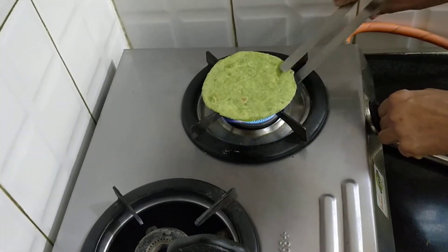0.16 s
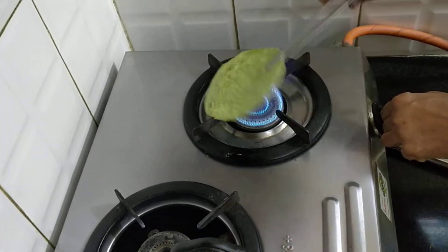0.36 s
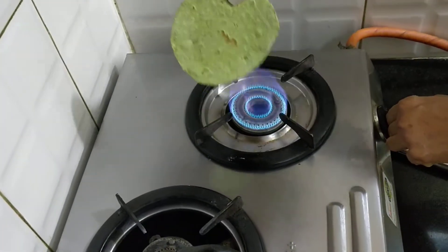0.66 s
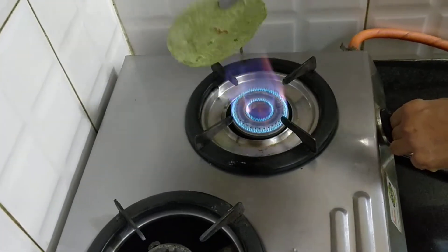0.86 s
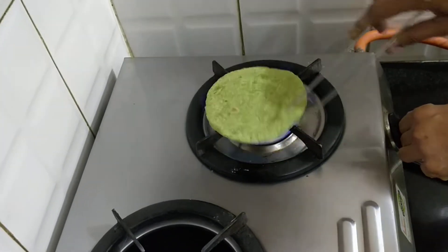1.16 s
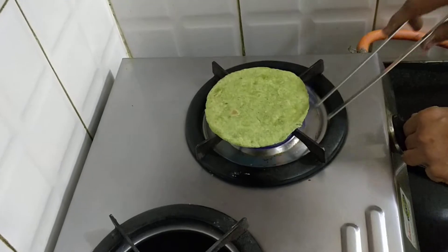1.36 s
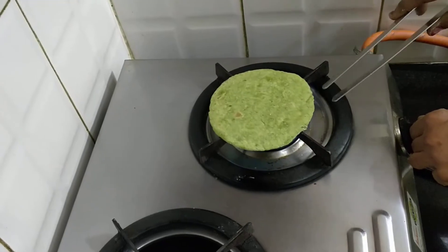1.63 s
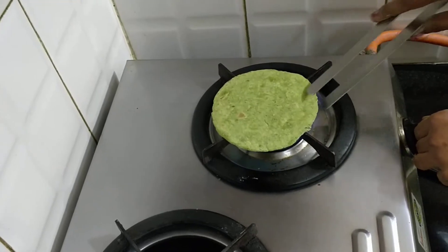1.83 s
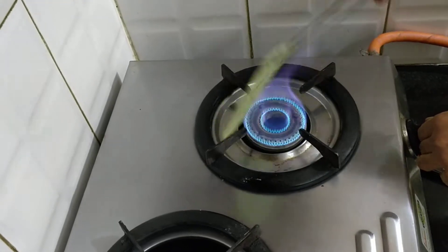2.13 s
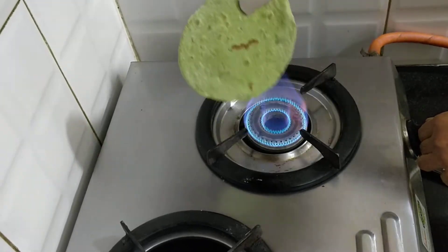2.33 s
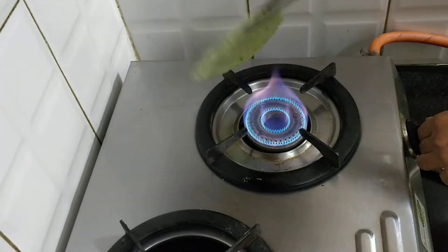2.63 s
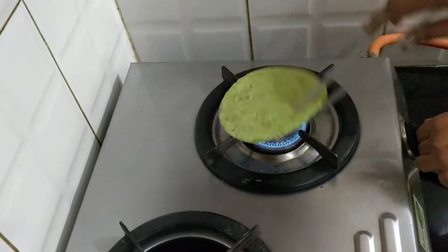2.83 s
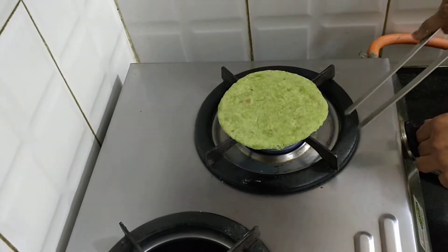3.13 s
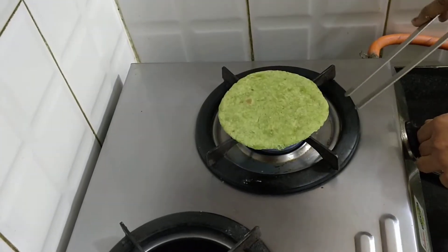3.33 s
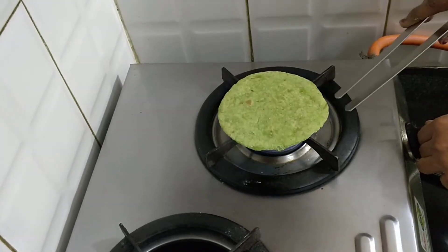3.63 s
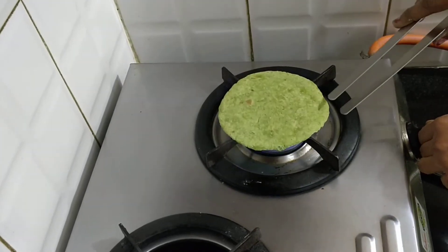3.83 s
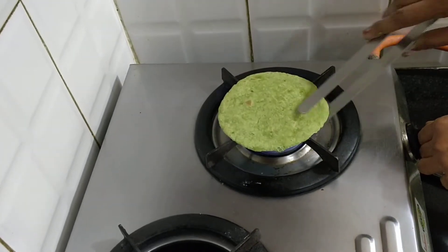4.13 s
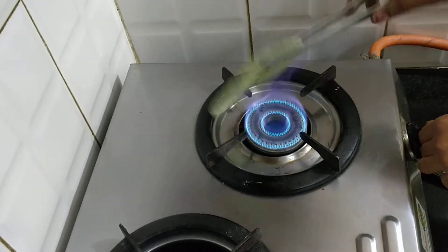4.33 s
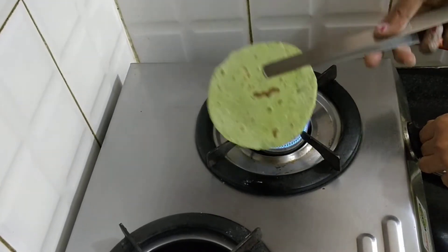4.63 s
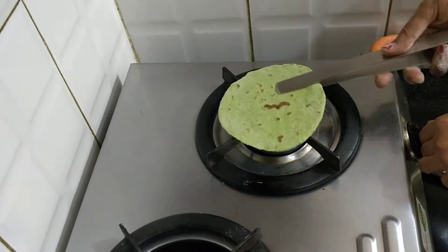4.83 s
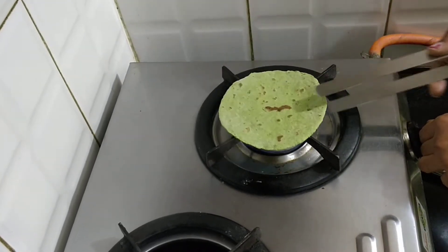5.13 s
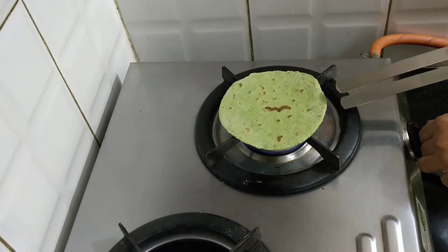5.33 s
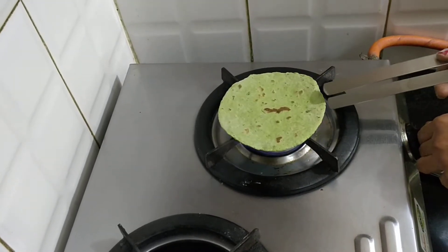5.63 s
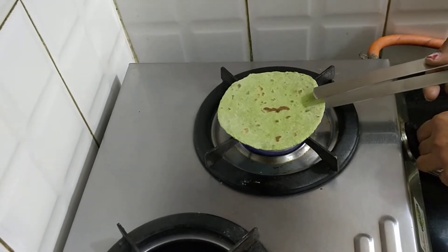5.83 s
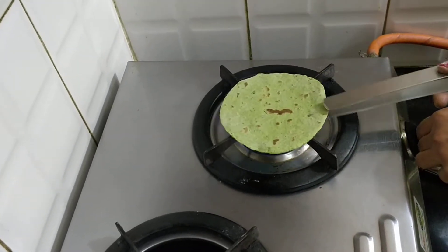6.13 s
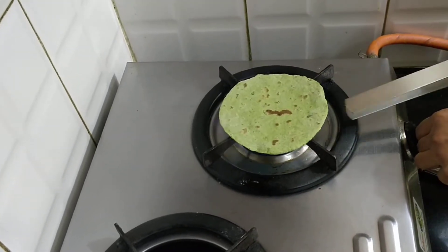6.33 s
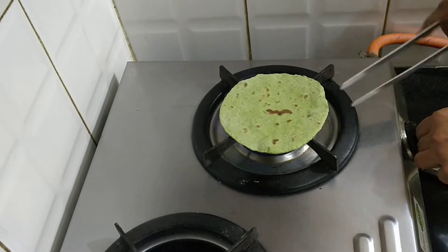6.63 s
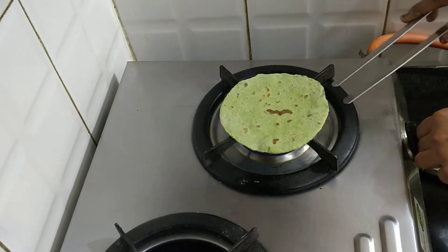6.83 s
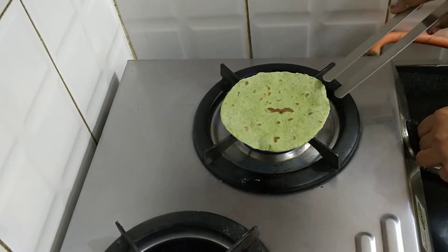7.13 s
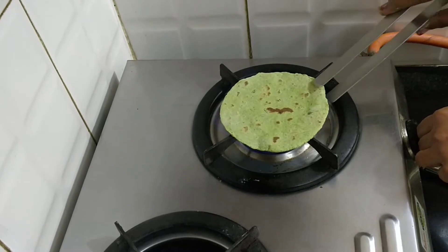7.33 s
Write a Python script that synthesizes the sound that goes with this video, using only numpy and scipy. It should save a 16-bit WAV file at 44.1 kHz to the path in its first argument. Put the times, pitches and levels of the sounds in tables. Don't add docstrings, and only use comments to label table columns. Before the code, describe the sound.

In a small tiled kitchen, metal tongs bump and scrape a burner grate in bursts, with one bright hard clack and quiet gas hiss.

```python
import sys
import numpy as np
from scipy import signal
from scipy.fft import rfft, irfft, next_fast_len
from scipy.io import wavfile
from scipy.ndimage import uniform_filter1d

SR = 44100
rng = np.random.default_rng(int(sys.argv[2]) if len(sys.argv) > 2 else 0)


def undo_db(level):
    steps = np.asarray(level, float) / 20
    return 10 ** steps


def generate_wav(sig):
    pcm = np.round(np.clip(np.atleast_2d(sig).T, -1, 1) * 32767).astype(np.int16)
    wavfile.write(sys.argv[1], SR, pcm)


N = 329868

# f/Hz, correlation/1
LIKENESS = [(60, 0.99), (130, 0.98), (290, 0.71), (640, 0.39), (1410, -0.25), (3100, 0.064), (6820, -0.01),
            (15000, 0.088)]
# f/Hz, left minus right level/dB
PORT_BALANCE = [(60, -0.5), (110, 3), (200, 2), (380, -2.5), (700, 2.5), (1290, -2), (2380, 1), (4400, 1),
                (8120, -4), (15000, 18)]
# f/Hz, t60/s
KITCHEN_DECAY = [(300, 0.51), (1000, 0.47), (3000, 0.33), (8000, 0.4), (14000, 0.27)]


def evened(x):
    return x / np.sqrt(np.mean(x ** 2) + 1e-20)


def read(points, hz):
    f, value = np.transpose(points)
    return np.interp(np.log(hz + 1), np.log(f + 1), value)


def add(mix, s, sound):
    fade = np.minimum(np.arange(sound.shape[1])[::-1] / 800, 1) ** 2
    part = mix[:, round(s * SR):][:, :sound.shape[1]]
    part += (sound * fade)[:, :part.shape[1]]


def sides(balance, hz):
    return undo_db(np.multiply.outer([.5, -.5], read(balance, hz)))


def coloured(x, colour, balance):
    hz = np.fft.rfftfreq(x.shape[1], 1 / SR)
    return irfft(rfft(x) * undo_db(read(colour, hz)) * sides(balance, hz), x.shape[1])


def partly_alike(first, second, hz_likeness):
    return np.array([first, hz_likeness * first + np.sqrt(1 - hz_likeness ** 2) * second])


def noise(colour, balance, size, decays=None, patchy_db=0.):
    frames, hz = size // 256 + 6, np.fft.rfftfreq(1024, 1 / SR)
    a, b, c, d, patches = rng.standard_normal((frames, 513, 5)).T
    patches = uniform_filter1d(patches, size=10, axis=0)
    patches = evened(uniform_filter1d(patches, size=12, axis=1))
    same = np.clip(read(LIKENESS, hz), -1, 1)[:, None]
    spectra = partly_alike(a + 1j * b, c + 1j * d, same)
    level_db = read(colour, hz)[:, None] + patchy_db * patches
    if decays:
        t = np.arange(frames) * 256 / SR
        level_db = level_db - 60 * t / read(decays, hz)[:, None]
    spectra = spectra * undo_db(level_db) * sides(balance, hz)[:, :, None]
    out = signal.istft(spectra, nperseg=1024, noverlap=768)[1][:, :size]
    onset = out.mean(0)[:2000 if decays else size]
    return out / np.sqrt(np.mean(onset ** 2))


def ring(modes, lag_ms, size):
    t = np.maximum(np.arange(size) / SR - np.array([[0], [lag_ms / 1000]]), 0)
    return sum(undo_db(db - 60 * t / t60) * np.sin(2 * np.pi * hz * t) for hz, db, t60 in modes)


def air():
    # f/Hz, spectral level/dB per Hz
    rumble_colour = [(11, -32), (18, 3.5), (38, -11), (69, -0.5), (108, -3), (157, -14), (203, -15.5),
                     (227, -37), (249, -13), (294, -12.5), (329, -23.5), (396, -20.5), (418, -21),
                     (742, -27), (1500, -37.5), (1950, -73), (3300, -120)]
    # f/Hz, spectral level/dB per Hz
    hiss_colour = [(880, -28), (1500, -1), (1670, -1), (1810, -5.5), (2420, -4.5), (3290, -7), (4950, -4.5),
                   (5420, -7), (6950, -5), (9090, -11.5), (9850, -11.5), (11300, 0), (13500, -3.5),
                   (15100, 1), (16200, -16)]
    # f/Hz, width/Hz, lift/dB
    humps = [(38.8, 10, -4), (65, 10, 4), (73.3, 8.5, -4.5), (88, 12, -2), (204, 14, 6.5), (317, 33, 4.5),
             (390, 6.6, 10.5), (489.5, 13, 6.5)]
    frames = next_fast_len(N)
    hz = np.fft.rfftfreq(frames, 1 / SR)
    lift_db = sum(db / (1 + ((hz - f) / width * 2) ** 2) for f, width, db in humps)
    white = rfft(rng.standard_normal((2, frames)))
    pair = partly_alike(white[0], white[1], np.clip(read(LIKENESS, hz), -1, 1))
    gain = undo_db(read(rumble_colour, hz) + lift_db) * sides(PORT_BALANCE, hz)
    rumble = irfft(pair * gain, frames)[:, :N]
    hiss = noise(hiss_colour, PORT_BALANCE, N, patchy_db=-1.0)
    return undo_db(-49.5) * evened(rumble) + undo_db(-63) * hiss


def rubbed(grit, modes):
    out = 0
    for hz, width, db in modes:
        peak = signal.iirpeak(hz, hz / width, SR)
        once = signal.lfilter(*peak, grit)
        out = out + undo_db(db) * evened(signal.lfilter(*peak, once))
    return evened(out)


def stroke(row, *layers):
    s, length, *levels_db = row
    at = np.arange(round(s * SR), min(round((s + length) * SR), N))
    press_db = np.interp((at / SR - s) / length, [0, 0.25, 1], [-14.5, 0, -11])
    mix = sum(undo_db(db) * layer[:, at] for db, layer in zip(levels_db, layers))
    return s, mix * undo_db(press_db) * signal.windows.tukey(len(at), .15)


def slides():
    # t/s, length/s, stove-top level/dB, prong level/dB, fine hiss level/dB
    strokes = [(0.042, 0.25, -61, -59.5, -61), (0.152, 0.14, -60.5, -82, -72),
               (0.945, 0.12, -49.5, -63, -69), (1.043, 0.17, -56, -84, -75), (1.769, 0.14, -54.5, -83, -58),
               (1.83, 0.15, -66, -61.5, -61), (2.02, 0.15, -64, -80, -70), (2.569, 0.14, -55.5, -57.5, -59),
               (2.68, 0.11, -52, -60, -75), (3.943, 0.092, -56, -61, -58), (3.996, 0.13, -49.5, -61, -59),
               (4.452, 0.17, -49.5, -62.5, -64), (5.733, 0.085, -62, -59, -61),
               (5.779, 0.11, -59, -57, -64), (5.867, 0.14, -53.5, -70, -67),
               (7.356, 0.058, -53.5, -55, -56.5), (7.427, .06, -61, -73, -61)]
    # f/Hz, width/Hz, level/dB
    dragged_top = [(492.8, 22, -7.5), (606, 46, -17), (269, 42, -8)]
    # f/Hz, width/Hz, level/dB
    prongs = [(743, 170, -7), (809, 84, 2.5), (1049, 16, -7.5), (1490, 220, -16)]
    # f/Hz, spectral level/dB per Hz
    hiss_colour = [(2000, -15), (3500, -12.5), (8000, -18), (9300, -28), (11300, -14), (15500, -10.5),
                   (16200, -11.5)]
    # t/s, length/s, level/dB
    squeak = (0.1, .14, -65)
    # f/Hz, width/Hz, level/dB
    squeak_mode = [(5395, 7.8, 0)]
    out = np.zeros((2, N))
    grit = rng.standard_normal((2, N))
    roughness_db = 4.1 * evened(uniform_filter1d(rng.standard_normal(N), size=400))
    grit = grit * undo_db(roughness_db)
    grit = grit + .5 * grit[::-1]
    hiss = noise(hiss_colour, PORT_BALANCE, N, patchy_db=1.0)
    layers = rubbed(grit, dragged_top), rubbed(grit, prongs), hiss
    for row in strokes:
        add(out, *stroke(row, *layers))
    add(out, *stroke(squeak, rubbed(rng.standard_normal((2, N)), squeak_mode)))
    return out


def knocks():
    # t/s, peak level/dB, rattle re
    # body/dB, dullness/dB per octave, twin mode level/dB
    blows = [(0.169, -41.5, -15.5, 25, -5), (0.703, -20.5, -18, 3.5, -1), (0.731, -25.5, -18, 3, -14),
             (0.782, -35, -37, 5, 10), (0.927, -37, -19, 7.5, -7), (1.914, -48, -14.5, 16, -18),
             (2.429, -23.5, -21.5, 5, -31), (2.456, -29, -18.5, 9, -11), (2.602, -56.5, -6, 15, -1),
             (2.65, -41.5, -25, 16, 6), (2.686, -37.5, -17.5, 13, 3), (3.904, -28, -23, 11, -17),
             (3.93, -36, -24, 10.5, -4), (4.059, -48.5, -26, 3, 5), (4.414, -31.5, -21.5, 18, -3.0),
             (4.512, -38.5, -39, 7.0, 2), (5.651, -29.5, -22, 13, -5.5), (5.878, -38.5, -28, 21, -8),
             (7.266, -26.5, -21, 10.5, -10), (7.291, -33, -21, 10.5, 6)]
    # f/Hz, level/dB, t60/s
    stove_modes = [(256, -27, 0.92), (305.8, 8, 0.26), (308, 10, 0.056), (363, -19, 0.48),
                   (408, -14.5, 0.48), (452, -21, 0.19), (527, -5, 0.79), (564.5, -1, 0.49),
                   (603, -16, 0.57), (655, -13, 0.52), (687, -11, 0.54), (790, -19, 0.67),
                   (753, -16, 0.089), (866, -5.5, 0.31), (942, -3.5, 0.48), (1069, 7, 0.076),
                   (1178, -6, 0.068), (1525, -2.5, 0.63), (1980, -15, .2)]
    # f/Hz, level/dB, t60/s
    twin_mode = [(288, 11, 0.31)]
    # f/Hz, spectral level/dB per Hz
    rattle_colour = [(200, -3), (300, 1), (550, 4), (800, -1.5), (1100, -6), (1400, -10), (1800, -8),
                     (2500, -11), (4000, -10.5), (6300, -18.5), (9000, -17)]
    # f/Hz, left minus right level/dB
    rattle_balance = [(60, 3), (110, -0.5), (200, 1.5), (380, 2.5), (700, 1), (1290, -3.5), (2380, 4),
                      (4400, -2), (8120, -7), (15000, 15)]
    size, contact_s = 22000, 0.98e-3
    t, out = np.arange(size) / SR, np.zeros((2, N))
    no_bass = signal.butter(3, 200, "high", fs=SR, output="sos")
    rise = undo_db([[1.7], [-1.7]]) * (1 - np.exp(-t / 0.0019))
    plate = signal.sosfilt(no_bass, -ring(stove_modes, lag_ms=0.23, size=size) * rise)
    twin = signal.sosfilt(no_bass, -ring(twin_mode, lag_ms=0.23, size=size) * rise)
    push = np.hanning(round(contact_s * SR) + 2)
    swell = (1 - np.exp(-t / 0.0026)) * (1 + 1.97 * np.exp(-t / 0.0091))
    grid = np.geomspace(200, 9000, 120)
    for s, db, rattle_db, dull_db, twin_db in blows:
        body = plate + undo_db(twin_db) * twin
        thud = signal.oaconvolve(body / abs(body).max(), push[None] / push.sum(), axes=1)[:, :size]
        colour = [(hz, level - dull_db * np.log2(max(hz, 1500) / 1500) ** 0.7)
                  for hz, level in rattle_colour]
        top_hz = np.clip(7700 - 360 * dull_db, 2400, 6700)
        cliff_db = -14 / (1 + np.exp((top_hz - grid) / 80))
        colour = np.c_[grid, read(colour, grid) + cliff_db].tolist()
        rattle = noise(colour, rattle_balance, size, KITCHEN_DECAY) * swell
        add(out, s - .0008, undo_db(db + 1.5) * (thud + undo_db(rattle_db + 0.5) * rattle))
    return out


def ticks():
    # t/s, peak level/dB, mid-treble re top/dB, t60/s, lower top band level/dB
    touches = [
        (0.6615, -38, -28.5, 0.026, -10),
        (2.5421, -55, -23, 0.029, -15),
        (3.887, -40, -27, 0.013, -12),
        (3.9614, -50, -34, 0.04, -14),
        (3.9908, -46, -33, 0.033, -22),
        (6.379, -44.5, -27, 0.027, -12),
    ]
    t, out = np.arange(6000) / SR, np.zeros((2, N))
    for s, db, mid_db, t60, lower_db in touches:
        colour = [(1500, mid_db + 5), (4000, mid_db), (8200, mid_db + 20.5), (9300, -24),
                  (11800, lower_db + 8.0), (13200, lower_db + 10.0), (14800, 0), (15800, -1.0),
                  (16500, -37.5)]
        grit = coloured(rng.standard_normal((2, 6000)), colour, PORT_BALANCE)
        decay = undo_db(-60 * t / t60) + undo_db(-14.5 - 60 * t / .2)
        shape = (1 - np.exp(-t / 0.00066)) * decay
        add(out, s - .001, undo_db(db - 1.0) * grit / grit.mean(0).std() * shape)
    return out


def clack():
    # t/s, level/dB
    chatter = [
        (4.6322, -12),
        (4.6329, -1.5),
        (4.6334, -3),
        (4.6346, -1.5),
        (4.6367, -4),
        (4.6388, -6),
        (4.641, -8),
        (4.645, -12),
    ]
    # f/Hz, spectral level/dB per Hz
    click_colour = [(180, -42), (300, -28), (566, -16), (2150, -43), (2420, -15), (3730, -19), (3990, -21),
                    (4790, -9), (5850, -4), (8310, -23), (9500, -19), (13700, 3.5), (16200, -13)]
    # f/Hz, spectral level/dB per Hz
    answer_colour = [(120, -31), (300, -6), (500, -1.5), (750, -5.5), (1600, -19.5), (2700, -26),
                     (3400, -8), (3950, -22), (4850, -4), (5450, -26), (5750, -20), (8300, -17.5),
                     (9000, -33), (13000, -8), (16000, -11)]
    # f/Hz, left minus right level/dB
    click_balance = [(60, -1.5), (110, -1.5), (200, 3.5), (380, 4), (700, 6), (1290, 5.5), (2380, 7.5),
                     (4400, 9), (8120, 10), (15000, 28)]
    # f/Hz, left minus right level/dB
    tail_balance = [(60, -3), (110, 2), (200, 17), (380, 1), (700, 2.5), (1290, -2.5), (2380, 4.5),
                    (4400, -7.5), (8120, -12), (15000, 7.5)]
    # f/Hz, level/dB, t60/s
    arm_modes = [(3380, -10, .35), (3450, -16, .45), (3720, -18, .3), (4134, -8, .23), (4696, -8, .3),
                 (4823, -3, .4), (4881, -1.5, .3), (5146, -12, .3), (5389, -3, .2), (5720, -9, .4),
                 (6630, -14, .2), (7300, -14, .15), (7900, -12, .2), (8302, -12, .3)]
    # f/Hz, level/dB, t60/s
    tip_modes = [(10300, -36, 0.096), (11160, -17, 0.26), (11800, -26, 0.1), (12630, -27, 0.28),
                 (14300, -22, 0.24), (14640, -22, .2), (15200, -8, 0.15), (15000, -7, 0.2)]
    # f/Hz, level/dB, t60/s
    support_modes = [(185, -4, 0.24), (295, 0, 0.33), (400, 3, 0.11), (514.5, 4.5, 0.29), (578, -7.5, 0.54),
                     (693, -8.5, 0.52), (840, -34, 0.66), (835, -3, 0.3), (883, 0.5, 0.1),
                     (1020, -3.5, 0.16), (1170, -22, 0.29), (1264, -7, 0.12), (1390, -19, 0.26),
                     (1420, -22, 0.37), (1430, -28, 0.66), (1550, -4, 0.16)]
    size = 26000
    t, out = np.arange(size) / SR, np.zeros((2, N))
    start = chatter[0][0]
    burst = sum(undo_db(db - 60 * np.maximum(t - s + start, 0) / 0.0068) * (t >= s - start)
                for s, db in chatter)
    after = undo_db(-6.0 - 60 * t / 0.019) * (1 - np.exp(-t / 0.0013))
    snap = coloured(rng.standard_normal((2, size)), click_colour, click_balance)
    snap = snap / snap.mean(0).std() * (burst + after)
    steel = undo_db(-34) * ring(arm_modes, lag_ms=0.13, size=size)
    steel = steel + undo_db(-24) * ring(tip_modes, lag_ms=0.11, size=size)
    steel = coloured(steel, [(100, 0), (16000, 0)], tail_balance) * (1 - np.exp(-t / 0.0017))
    answer = noise(answer_colour, tail_balance, size, KITCHEN_DECAY) * (1 - np.exp(-t / 0.0018))
    thump = ring(support_modes, lag_ms=0.14, size=size)
    thump = thump * undo_db([[1.6], [-1.6]]) * (1 - np.exp(-t / 0.0026))
    add(out, start + 0.00204, undo_db(-21.5) * thump / abs(thump).max())
    add(out, start, undo_db(-12.5) * snap + steel + undo_db(-30.0) * answer)
    return out


def scene():
    return air() + slides() + knocks() + ticks() + clack()


def low_pass(x):
    return signal.sosfilt(signal.butter(12, 15800, fs=SR, output="sos"), x)


def record(dry):
    rounded = .9 * np.tanh(dry / .9)
    edge = signal.firwin(801, 15800, window=("kaiser", 10), fs=SR)
    mix = signal.oaconvolve(rounded, edge[None], "same", axes=1)
    return low_pass(mix)


dry = scene()
out = record(dry)
generate_wav(out)
```